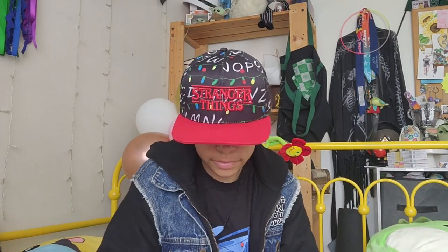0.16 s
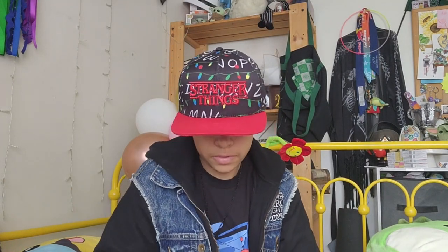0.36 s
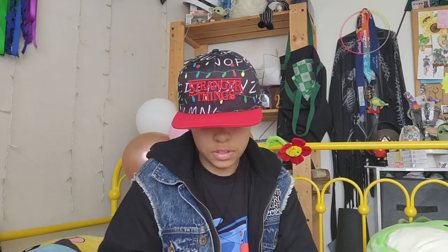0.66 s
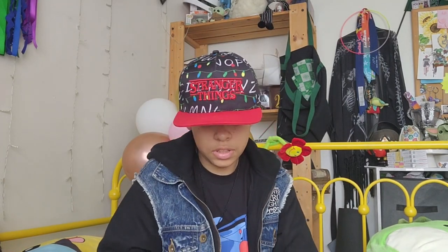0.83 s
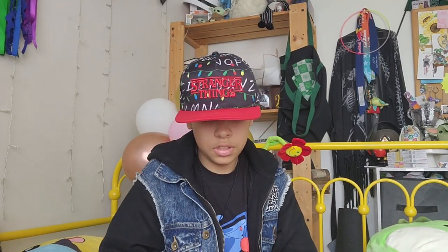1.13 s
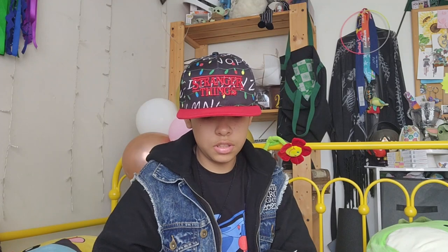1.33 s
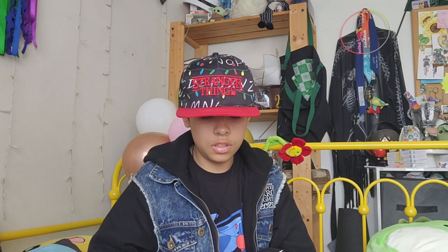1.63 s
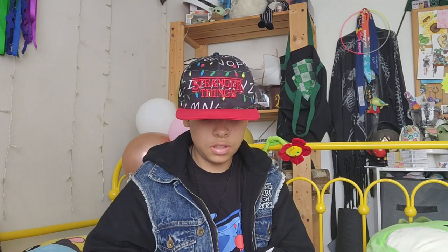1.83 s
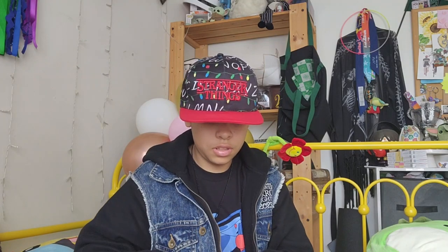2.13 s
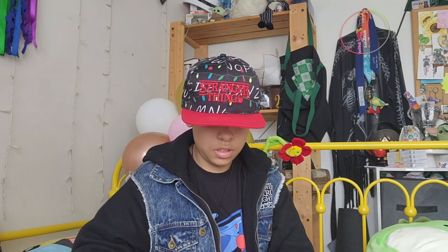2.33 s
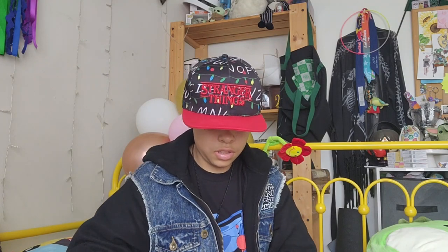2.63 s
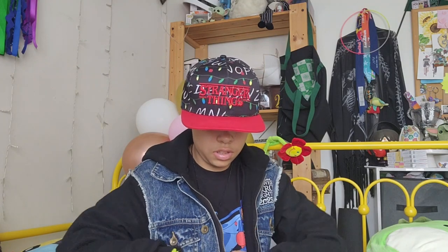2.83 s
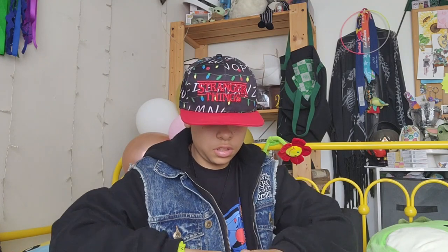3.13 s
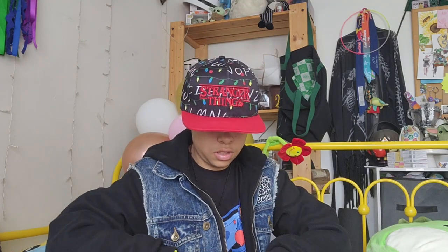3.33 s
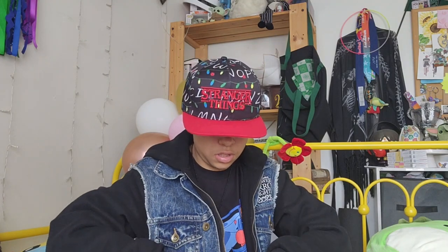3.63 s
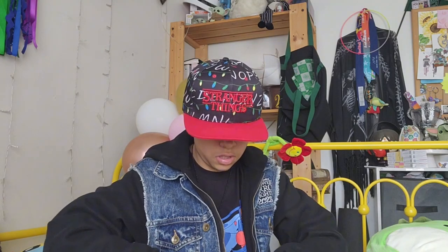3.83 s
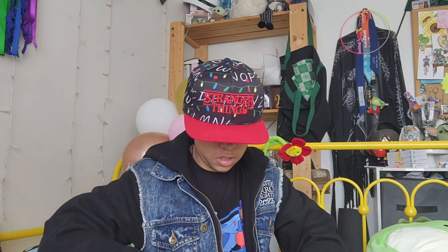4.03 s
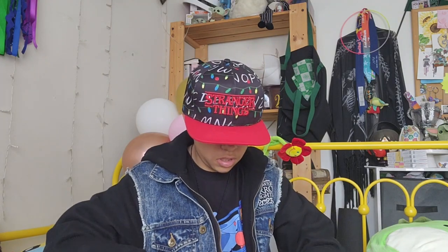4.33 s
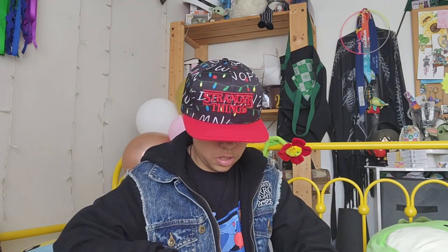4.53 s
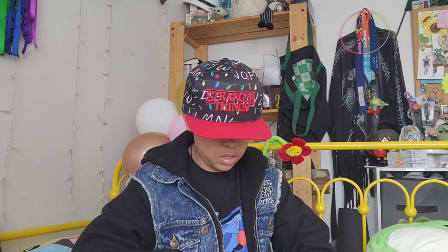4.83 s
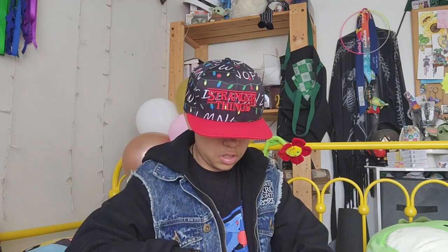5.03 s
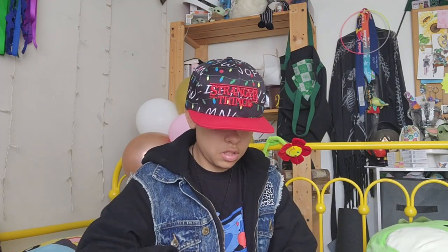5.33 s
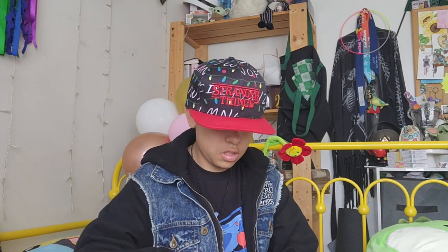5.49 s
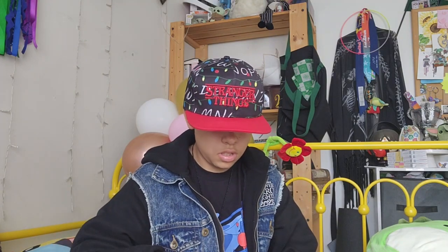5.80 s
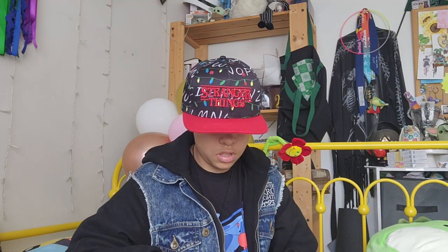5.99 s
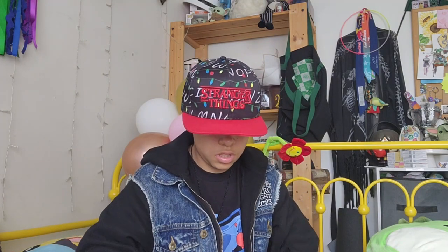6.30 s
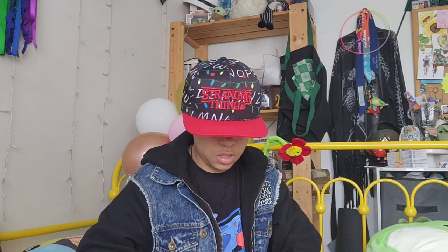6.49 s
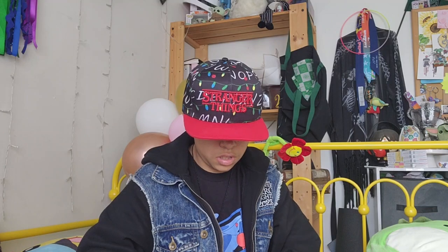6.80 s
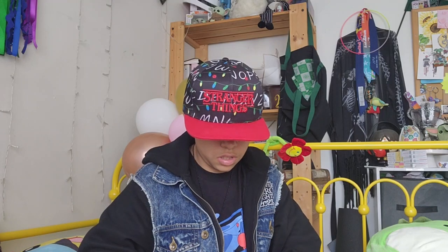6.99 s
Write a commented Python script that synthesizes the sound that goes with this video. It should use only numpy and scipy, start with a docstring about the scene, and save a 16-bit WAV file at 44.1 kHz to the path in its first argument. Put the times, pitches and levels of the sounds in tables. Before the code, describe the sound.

In a quiet small room, paper crackles and rips in short, uneven bursts just below a stereo microphone, slightly to the left. An envelope is picked at and torn, building to one loud, crisp burst of snapping and ripping near the middle. Then stiff card and paper slide and crinkle more gently, with some soft low thumps and a few last snaps. A faint rumble and hiss lie underneath.

```python
"""In a small furnished room, hands tear paper envelopes and handle stiff cards just below a stereo mic.
Paper fibres rip and rustle in a dense crackle, coloured by the pocket of air inside the envelope.
Creases snap and make the flat panels of paper beside them ring. The walls answer briefly.
Underneath are a low rumble, a few dull bumps through the furniture and a faint hiss."""
import sys
import numpy as np
from scipy import signal
from scipy.fft import rfft, irfft, next_fast_len
from scipy.io import wavfile
from scipy.ndimage import uniform_filter1d, map_coordinates

SR = 44100
rng = np.random.default_rng(int(sys.argv[2]) if len(sys.argv) > 2 else 0)


def materialize(psi):
    """Save the field psi as 16-bit PCM at rate SR to the path in sys.argv[1].

    A 1-D psi becomes a single channel; in a 2-D psi each row is a channel.
    """
    bounded = np.clip(np.atleast_2d(psi).T, -1, 1)
    quanta = np.round(bounded * 32767).astype(np.int16)
    wavfile.write(sys.argv[1], SR, quanta)


N = 315315

# The paper's sound has four bands, from low to high: flex, crumple, fizz and fine fizz.
# Creases that snap. Each row: start in seconds, peak in dB, then thump, fizz and fine fizz in dB
# compared with the middle pitches, ringing note in Hz, the rip that follows in dB compared with the peak.
SNAPS = [(0.0004, -18.5, -26, 2.5, -12, 5750, -7), (0.018, -25.5, 4.5, -12, -14.5, 363, -30.5),
         (0.083, -39, 2.5, -2, -33, 1500, -7.5), (0.1028, -33, -8, -6, -35, 1610, -28),
         (0.194, -40.5, -9, 10, -6, 1490, -19), (0.258, -40.5, -16, -1, -20, 5200, -25),
         (0.466, -39, -16, 26, 5, 4160, -27), (0.5146, -38, 10, 7, -37, 3030, -24),
         (0.656, -34, 0.5, 7, -11, 355, -31), (0.6685, -35.5, -16, -40, -36, 1580, -39),
         (0.7108, -26, 3.5, 11.5, 2, 2830, -31), (0.75, -18, -22, 0.5, 5, 4900, -39.5),
         (0.8808, -26.5, -25, 12.5, 8, 5360, -14), (0.8961, -24, -24, 11.5, -19, 5250, -11),
         (0.9274, -23.5, -31, 13, -35, 5800, -16), (0.9859, -31.5, -15, -13, -8, 960, -27),
         (1.035, -39, -2, -7, -19, 840, -30), (1.6615, -38.5, -33, 3, 6, 7750, -42),
         (1.714, -39, -20, 14, 0.5, 8000, -25), (1.755, -26.5, -3.5, 10, 8.5, 3100, -16.5),
         (1.78, -25.5, -6, 1, 0, 6800, -30), (1.8394, -42.5, -6, -18, -24, 2170, -19),
         (1.9, -36, -0.5, -26, -36, 1630, -36), (1.9927, -38.5, -4, -5, -33, 2400, -34),
         (2.032, -35.5, -6, -3, -35, 2180, -24), (2.1231, -43.5, 3, -21, -29, 2300, -47),
         (2.161, -46, 6, -14, -25.5, 2230, -40), (2.2232, -36, -6, 10, -11, 1520, -24),
         (2.2858, -33, -5, 4, -3.5, 1410, -28), (2.3094, -26.5, 3.5, 4, 1, 710, -18),
         (2.3355, -16.5, -11.5, 5.5, -8, 730, -31.5), (2.3958, -35, -12, -21, -45.5, 1370, -28),
         (2.4232, -38.5, -2, -15, -27, 2200, -34), (2.645, -33.5, -21, -22, -18, 1730, -41),
         (2.6615, -26.5, -19, 32.5, -8, 1830, -34), (2.686, -24.5, -10, 18, -10.5, 2100, -31),
         (2.7806, -45.5, -8, -37, -13, 1520, -41), (2.825, -40, 2, 6, -9, 626, -42),
         (2.9239, -39, 2.5, 8, 1, 2380, -34), (3.0395, -27.5, -2, -5, -20.5, 440, -28),
         (3.1208, -36.5, -12, 1, -18, 2230, -46), (3.1913, -39, 6, -3, -7, 2300, -36),
         (3.223, -37.5, -28, -23, -27, 2500, -16), (3.252, -32, -17, -40, -41, 2470, -40),
         (3.3886, -43.5, -36, -3, -29, 3380, -22), (3.5925, -36, -12, -39, -41, 1800, -54),
         (3.6533, -46.5, -7, 11, -25, 3320, -17), (3.705, -27, -13, -21, -43, 2220, -37),
         (3.7284, -13, -2.5, -9, -13, 1840, -37), (3.8192, -9, -10, -7, -4.5, 2060, -21.5),
         (3.856, -23.5, -9, -28, -37.5, 1790, -21), (3.885, -13.5, -6, -22, -19, 1360, -20),
         (3.9114, -10, -12, -5, -13, 1260, -25.5), (4.0756, -34, 4, -25, -31.5, 1760, -26),
         (4.1111, -23.5, -6.5, -7.5, -41, 2170, -28), (4.303, -50, -26.5, -14.5, 6, 3970, -6.5),
         (4.3564, -33, -4.5, -1, -3, 5170, -26.5), (4.4348, -42, -9, 5, -9, 5030, -22),
         (4.591, -45, 0, 13, 0, 1870, -15), (4.607, -30.5, -6, 0.5, -5.5, 2670, -18),
         (4.766, -37, 0, -0.5, 0, 2370, -32), (4.8885, -33, -8, 5, -4.5, 2200, -63),
         (4.9573, -33, 1, 10, 1, 1850, -27), (5.0079, -31.5, -7, 10.5, -4, 3520, -22),
         (5.078, -40.5, -24, 0, -12, 2000, -8), (5.0863, -29, -5, -8, -9, 392, -33),
         (5.1843, -49, -14, -18, -35.5, 2210, -22), (5.243, -30.5, -5.5, 11, -3, 1980, -25),
         (5.3971, -29, 1, 0, -56, 2220, -24), (5.4033, -23.5, -6.5, -8, -66, 2280, -42),
         (5.4135, -28, -4.5, -8, -57.5, 366, -45), (5.5495, -33.5, -8, 15, -31, 1400, -26),
         (5.676, -45.5, 12, -5, -26, 1540, -24.5), (5.8017, -42, -1, -6, -29, 1670, -43),
         (5.893, -35.5, 1, 12, -5, 2800, -19), (5.9352, -37, 8, 18, 3, 1270, -25),
         (6.005, -40, -2, 7, -28, 5300, -12.5), (6.106, -42, 2, 6, -14, 1560, -20),
         (6.1647, -44.5, 3, 22, 17, 7600, -14), (6.1873, -31, -4, 16, 1, 1570, -26.5),
         (6.2962, -28.5, -23.5, 11, 10, 5750, -53), (6.4156, -34.5, -40, 13, -39, 3270, -41),
         (6.5237, -34.5, -21, -2, -13, 2420, -10), (6.5322, -22, -4.5, 3.5, -19, 2220, -20),
         (6.583, -30.5, -4, -27, -30, 2730, -41), (6.5928, -29, -30, -21, -45, 2030, -56),
         (6.685, -39, 7, -11, -20, 373, -27), (6.7021, -37.5, -6, 2, -14, 370, -14),
         (6.7349, -22, 3.5, 3.5, -6.5, 540, -24.5), (6.8356, -44, 1, 16, 1, 4200, -16),
         (6.9894, -47.5, -15, -40, -36, 1380, -50)]
# Restless fingers on the paper. Each row: time in seconds, crumple level in dB, fine fizz level in dB.
FINGERS = [(0.0, -55, -65), (0.1, -60, -79), (0.28, -73, -86), (0.57, -70, -89), (0.9, -61.5, -75),
           (1.19, -71, -84), (1.55, -73, -83), (1.87, -54, -72), (2.03, -61.5, -88), (2.63, -64.5, -85),
           (3.38, -61, -68), (3.7, -63.5, -74), (3.94, -48, -77), (4.16, -77.5, -84), (5.14, -66, -80),
           (5.73, -78, -100), (6.03, -60, -74), (6.69, -65.5, -82), (6.93, -68, -77), (7.15, -74.5, -89)]
# Sheets that slide or bend. Each row: loudest moment in seconds, crumple level in dB, seconds to rise
# 20 dB, seconds to fall 20 dB (negative means a quick stop), then flex, fizz and fine fizz in dB
# compared with the crumple, the air pocket's upper note in Hz.
STROKES = [(0.015, -35, 0.074, .045, -6, 4, -9.5, 1900), (0.12, -55, 0.067, -0.12, -9, -19, -23, 1450),
           (0.28, -56, 0.14, 0.04, -15, 6, -5, 2100), (0.5, -57.5, 0.067, -0.47, -4.5, -9, -25, 1680),
           (0.6, -66.5, .03, -0.5, 2, -8, -27, 1500), (0.67, -52, .05, 0.07, -12, 0, -6, 1590),
           (0.76, -56, 0.11, -0.22, 0, 3, -4.5, 2700), (0.925, -36.5, 0.026, 0.105, -21, 4, -0.5, 1600),
           (0.985, -48, .08, 0.05, -2.5, 0, -2.5, 1650), (1.055, -66, .02, 0.13, -12, -22, -8, 1450),
           (1.61, -61, 0.13, -0.34, -7, 0, -16, 1060), (1.72, -65.5, .05, -0.66, -27, 5, -1, 1600),
           (1.77, -49.5, 0.045, -0.31, -7, 5.5, 4, 1560), (1.85, -52, 0.017, -0.14, -17, 2, -13.5, 2270),
           (1.93, -63, 0.12, -0.2, -15.5, 4.5, -5, 2200), (2.03, -53.5, .12, -0.05, -6.5, -5, -12, 2273),
           (2.2, -66.5, 0.027, .05, -5, -10, -22, 1623), (2.31, -47, 0.099, -0.18, -14, -1, -13, 1360),
           (2.67, -43.5, 0.083, -0.02, -11, 2.5, -7, 1880), (2.77, -61, 0.041, -0.5, -2.5, -1, -17, 1382),
           (2.89, -61.5, 0.035, -0.58, -25, 1, -5, 2430), (3.13, -52.5, 0.05, -0.77, -6.5, 2, -13, 2280),
           (3.25, -49, 0.05, 0.14, -12, -5, -29, 2200), (3.42, -41, 0.031, 0.04, -44, -8, -17, 3260),
           (3.51, -59, .04, 0.02, -1, -9, -14, 1200), (3.83, -36, .02, 0.1328, -12, -8, -9, 2050),
           (3.905, -24, 0.021, 0.0679, -6.5, 5.5, -5.5, 2080),
           (3.965, -36.5, 0.056, 0.06, -13, 0, -11.5, 2300),
           (4.005, -41.5, .05, -0.0145, -13, 4, -6.5, 2300), (4.37, -61, 0.093, 0.2, -16, 3, -7.5, 1600),
           (4.46, -62, 0.023, -0.18, -12, 7, 2, 2100), (4.83, -56.5, 0.05, -0.29, -8, 3, -3, 2100),
           (4.9, -58.5, 0.12, 0.35, -6.5, -2, -11, 2060), (5.0, -57, 0.02, -0.35, -29, 3, -11.5, 2160),
           (5.36, -58, .3, 0.25, -12.5, 1.5, -12, 1820), (5.57, -63, 0.11, -0.3, -5.5, -1, -43.5, 1670),
           (5.7, -69, 0.14, 0.1, 2.5, -5, -18, 1050), (5.81, -64.5, 0.063, 0.14, -1, -6, -26, 1400),
           (6.48, -53.5, 0.055, 0.06, -42, 0, -29, 2030), (6.59, -58.5, 0.12, 0.23, -5, -9.5, -38.5, 2080),
           (6.83, -68, 0.095, -0.48, 0.5, 9, 0, 2520)]
# The tone of rustling paper. Each row: frequency in Hz, level in dB.
PAPER_TONE = [(88, -52.5), (150, -28.5), (334, -5), (383, -7), (439, -9.5), (649, -10.5), (1020, -10),
              (1480, -9.5), (1690, -7.5), (2000, -7.5), (2230, -4), (2500, -7), (3700, -5), (4410, -1.5),
              (6000, 15.5), (7600, 15), (8400, 6.5), (9260, 3.5), (14500, 15), (16000, 6.5)]
# The tones of the deep rumble, the upper rumble and the hiss. Each row: frequency in Hz, level in dB.
DEEP_TONE = [(12, -42), (20, -13), (49, -2), (65, -5), (80, -16.5), (100, -78), (180, -120)]
UPPER_TONE = [(41, -43), (70, 2.5), (119, -4), (170, -6.5), (220, -6.5), (370, -120)]
HISS_TONE = [(71, -15), (120, -3.5), (378, 2), (483, -1.5), (949, -12), (2110, -9), (2700, -19),
             (7500, -11.5), (9210, -22.5), (15000, -25), (16000, -49)]
# Dull bumps. Each row: loudest moment in seconds, peak in dB, pitch in Hz, seconds to fall 20 dB.
BUMPS = [(0.02, -47, 50, .08), (0.74, -55, 130, .04), (1.27, -63, 155, .07), (3.05, -56, 150, .04),
         (3.96, -55, 60, .08), (5.08, -53, 58, .06), (5.17, -46, 48, .05), (5.54, -52, 92, .05),
         (5.785, -39, 58, .065), (5.86, -52, 90, .04), (5.93, -48, 88, .06), (6.3, -53, 56, .06),
         (6.47, -54, 56, .05)]
# The room's echo. Each row: frequency in Hz, seconds to fade by 60 dB.
ECHO_TIMES = [(200, 0.11), (1000, 0.088), (4000, 0.12), (12000, 0.07)]
# Sound from all sides. Each row: frequency in Hz, how alike left and right are (1 means the same).
LIKENESS = [(40, 0.93), (130, 0.88), (290, 0.91), (640, 0.56), (1400, 0.11), (4000, 0)]

SNAP_FADE_S = 0.03  # time to fade by 60 dB, for a 2 kHz note in a -30 dB snap
THUMP_HZ, THUMP_SPREAD, THUMP_SHARE = 535, .45, 0.54  # the low panel: usual note, scatter, strength
SNAP_PAN_DB, PAN_SCATTER_DB = 3.5, 2.5  # left over right
RIP_RISE_S = 0.003
RIP_HOLD_S, RIP_TILT_DB = [.035, 0.032, 0.024, 0.039], [-7.5, -1.5, -5, -5.5]  # one value for each band
DEEP_DB, UPPER_DB, WAVER_DB, SURGE_DB, HISS_DB = -64.5, -68.5, 1.85, -56, -67.5  # rumble and hiss
TOP_HZ = 15800


def amp(db):
    """Turn decibels into a number to multiply by."""
    return 10 ** (np.asarray(db) / 20)


def unit(x):
    """Scale x to an average (rms) strength of 1."""
    return x / np.sqrt(np.mean(x ** 2) + 1e-20)


def along(points, hz):
    """Read between (Hz, value) points on a pitch-like scale."""
    f, v = np.transpose(points)
    return np.interp(np.log(hz + 1), np.log(f + 1), v)


def wobble(rate):
    """A smooth random curve through `rate` points a second."""
    return map_coordinates(rng.standard_normal(int(N * rate / SR) + 4), [np.arange(N) * rate / SR])


def swell(s, rise, fall):
    """A swell that peaks at s seconds; rise and fall are seconds per 20 dB."""
    corners = [s - 5 * max(rise, .01), s, s + 5 * max(fall, .01)]
    return amp(np.interp(np.arange(0, N, 32) / SR, corners, [-100, 0, -100])).repeat(32)[:N]


def filtered(x, response):
    """Multiply each frequency in x by response(hz)."""
    m = next_fast_len(N + SR // 2)
    return irfft(rfft(x, m) * response(np.fft.rfftfreq(m, 1 / SR)), m)[..., :N]


def flicker(x, depth_db, bins, frames):
    """Make random patches of pitch and time louder or softer."""
    spectrum = signal.stft(x, nperseg=256)[2]
    patches = uniform_filter1d(rng.standard_normal(spectrum.shape[-2:]), bins, 0)
    patches = uniform_filter1d(patches, frames, 1)
    return signal.istft(spectrum * amp(depth_db * unit(patches)), nperseg=256)[1][..., :N]


def all_around(x):
    """Mix two unrelated signals so they seem to come from all sides."""
    angle = lambda hz: np.arccos(np.clip(along(LIKENESS, hz), -1, 1)) / 2
    mid, side = filtered(x, lambda hz: np.array([np.cos(angle(hz)), np.sin(angle(hz))]))
    return np.array([mid + side, mid - side])


def crease_snaps():
    """Each crease lets go with a crack and rings the panels beside it, with new notes for every fold."""
    out, t = np.zeros((2, N + SR)), np.arange(SR // 25) / SR
    count = 72  # notes in one snap
    for s, db, thump_db, fizz_db, fine_db, ring_hz, _ in SNAPS:
        tuning, strength, push, lateness, side = rng.random((5, count, 1))
        hz = 250 * (15500 / 250) ** ((np.arange(count)[:, None] + tuning) / count)
        tone = [(250, thump_db - 8.5), (700, thump_db), (2300, 0.0056), (6000, fizz_db), (11500, fine_db)]
        near = lambda note_hz: np.exp(-(np.log(hz / note_hz) / 0.11) ** 2)
        thump_hz = THUMP_HZ * np.exp(THUMP_SPREAD * rng.standard_normal())
        lift_db = 11.6 * (THUMP_SHARE * near(thump_hz) + near(ring_hz))
        size = amp(along(tone, hz) + 5 * strength + lift_db) * np.sign(push - .5)
        softness = db / -30  # in quieter snaps the panels join in later and ring longer
        age = np.maximum(t - .001 * softness ** 2.894 * lateness ** 2, 0)
        fade_s = SNAP_FADE_S * softness ** 0.2 * (2000 / hz) ** 0.38  # high notes die sooner
        ring = amp(-60 * age / fade_s)
        crack = 1.9 * np.sqrt(hz / 4000) * amp(-60 * age / .003)  # brighter than the ring
        notes = size * (ring + crack) * np.sin(2 * np.pi * hz * age)
        pan_db = SNAP_PAN_DB + PAN_SCATTER_DB * rng.standard_normal()
        side_db = pan_db / 2 + 4 * (side - .5)  # the panels lie on different sides
        pair = np.array([np.sum(notes * amp(k * side_db), 0) for k in (1, -1)])
        out[:, round(s * SR):][:, :len(t)] += amp(db) * pair / np.abs(pair.mean(0)).max()
    return out[:, :N]


def hand_effort():
    """How strongly the fingers, the strokes and the rip after each snap drive the four bands."""
    times, *levels = np.transpose(FINGERS)
    crumple_db, fine_db = [np.interp(np.arange(N) / SR, times, level) for level in levels]
    gains = amp([crumple_db - 8, crumple_db, crumple_db - 2.5, fine_db])
    for s, db, rise, fall, flex_db, fizz_db, fine_db, _ in STROKES:
        gains += amp(db + np.array([flex_db, 0, fizz_db, fine_db]))[:, None] * swell(s, rise, fall)
    t = np.arange(SR // 8) / SR
    bite = 1 - np.exp(-t / RIP_RISE_S)
    let_go = np.exp(-(t / np.array(RIP_HOLD_S)[:, None]) ** 3)
    for s, db, thump_db, fizz_db, fine_db, _, rip_db in SNAPS:
        tilt_db = RIP_TILT_DB + .6 * np.array([thump_db, 0, fizz_db, fine_db])  # partly the snap's tone
        gains[:, round(s * SR):][:, :len(t)] += amp(db + rip_db + tilt_db)[:, None] * bite * let_go
    return gains


def air_pocket(x, boost_db, width, note_ratio):
    """The air inside the envelope lifts two notes, which move from stroke to stroke."""
    hz, t, spectrum = signal.stft(x, SR, nperseg=512)
    times, *_, notes_hz = np.transpose(STROKES)
    upper_hz = np.interp(t, times, notes_hz)
    near = lambda note_hz: np.exp(-(np.log((hz[:, None] + 1) / note_hz) / width) ** 2)
    lift_db = boost_db * (near(upper_hz) + near(upper_hz / note_ratio))
    return signal.istft(spectrum * amp(lift_db), SR, nperseg=512)[1][..., :N]


def paper_rustle():
    """Fibres part in clumps: many tiny cracks, some bigger, over the hiss of sliding sheets."""
    cracks = (rng.random(N) < 600 / SR) * amp(np.minimum(5 * rng.exponential(1, N), 15))
    crack_fade = amp(-60 * np.arange(SR // 50) / SR / .004)
    crackle = unit(signal.fftconvolve(cracks, crack_fade)[:N])
    grain = (crackle + 2.9) * amp(1.19 * wobble(45))  # the steady part is the sliding
    # A wide sheet reaches each side of the microphone a little differently.
    sheet = grain * (rng.standard_normal(N) + all_around(rng.standard_normal((2, N))))
    sheet = flicker(sheet, depth_db=3.2, bins=4, frames=5)  # bending keeps shifting its notes
    sheet = air_pocket(sheet, boost_db=5, width=0.17, note_ratio=1.75)
    sheet = filtered(sheet, lambda hz: amp(along(PAPER_TONE, hz)))
    edges = [(1300, "low"), ((1300, 4000), "band"), ((4000, 8500), "band"), (8500, "high")]
    bands = [signal.butter(3, hz, kind, fs=SR, output="sos") for hz, kind in edges]
    return sum(gain * unit(signal.sosfilt(band, sheet)) for gain, band in zip(hand_effort(), bands))


def wall_echo(x):
    """The walls answer a moment later, and each frequency dies away at its own speed."""
    hz, t, spectrum = signal.stft(rng.standard_normal((2, SR // 2)), SR, nperseg=256)
    fade = amp(-60 * t / along(ECHO_TIMES, hz)[:, None])
    tail = signal.istft(spectrum * fade, SR, nperseg=256)[1]
    delayed = np.pad(x, (130, 0))[None]
    return all_around(signal.fftconvolve(delayed, tail / np.linalg.norm(tail[0]), axes=1)[:, :N])


def rumble_and_hiss():
    """A distant rumble wavers, and its upper part swells once, under the room's faint hiss."""
    def noise(tone):
        return unit(filtered(all_around(rng.standard_normal((2, N))), lambda hz: amp(along(tone, hz))))
    deep = amp(DEEP_DB + WAVER_DB * wobble(3))
    upper = amp(UPPER_DB + WAVER_DB * wobble(4)) + amp(SURGE_DB) * swell(5.85, rise=.7, fall=.6)
    rumble = deep * noise(DEEP_TONE) + upper * noise(UPPER_TONE)
    return rumble + amp(HISS_DB) * flicker(noise(HISS_TONE), depth_db=0.95, bins=4, frames=9)


def dull_bumps():
    """Bumps come through the furniture, each a low note that swells and fades quickly."""
    out, t = np.zeros(N + SR), np.arange(-SR // 2, SR // 2) / SR
    for s, db, hz, fall_s in BUMPS:
        level = amp(db - 20 * np.minimum((t / fall_s) ** 2, 10))
        out[round(s * SR):][:SR] += level * np.sin(2 * np.pi * hz * t)
    return out[SR // 2:][:N]


def scene():
    """The paper close by, its echo and the room's background."""
    paper = crease_snaps() + paper_rustle() * amp([[.6], [-.6]])
    def left_first(lead_s):
        return filtered(paper, lambda hz: np.exp(1j * np.pi * hz * lead_s * np.array([[1], [-1]])))
    drift = np.interp(np.arange(N) / SR, [4.3, 5.2], [0, 1])  # the hands move further left
    direct = (1 - drift) * left_first(3.5e-5) + drift * left_first(7e-5)
    return direct + amp(-4.5) * wall_echo(paper.mean(0)) + rumble_and_hiss() + dull_bumps()


def record(dry):
    """Nothing above the top frequency is kept."""
    return filtered(dry, lambda hz: hz < TOP_HZ)


dry = scene()
out = record(dry)
materialize(out)
```